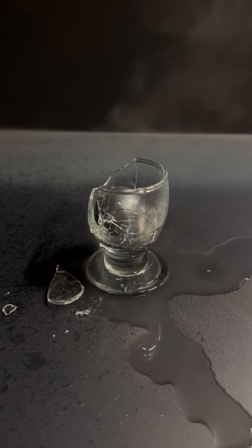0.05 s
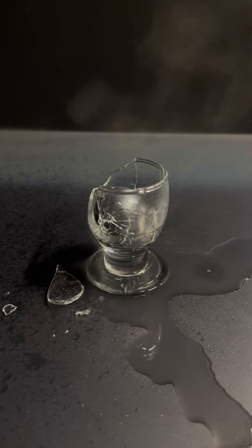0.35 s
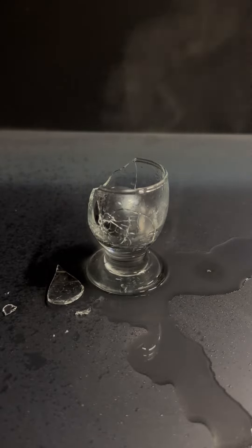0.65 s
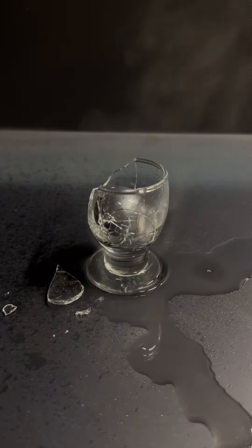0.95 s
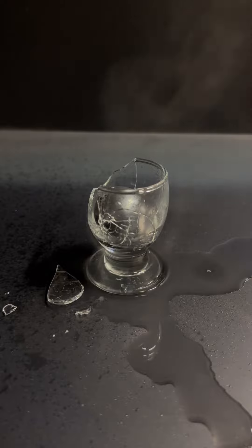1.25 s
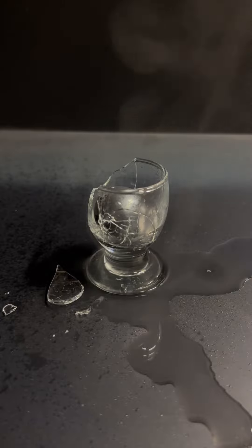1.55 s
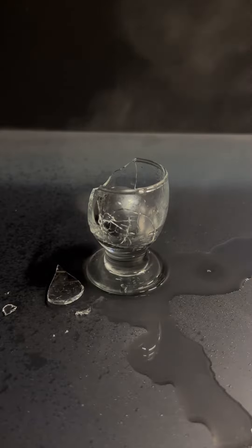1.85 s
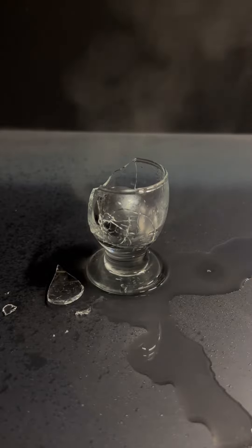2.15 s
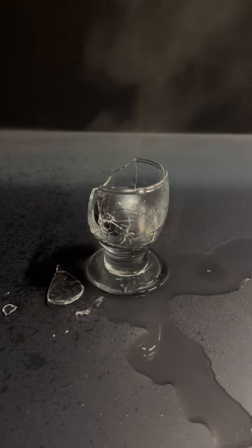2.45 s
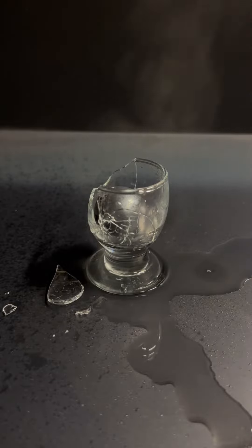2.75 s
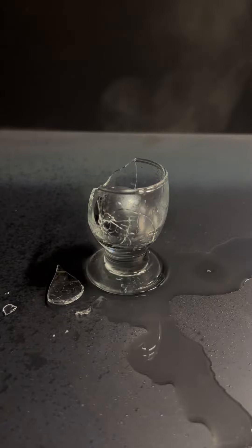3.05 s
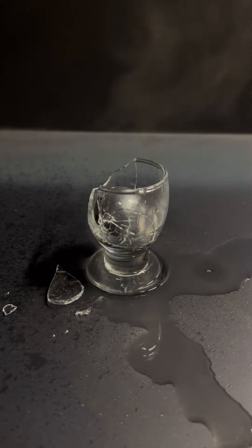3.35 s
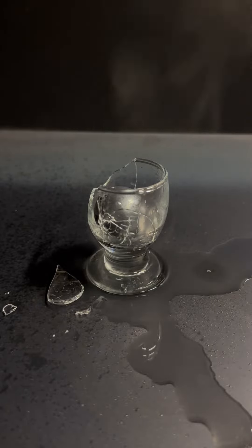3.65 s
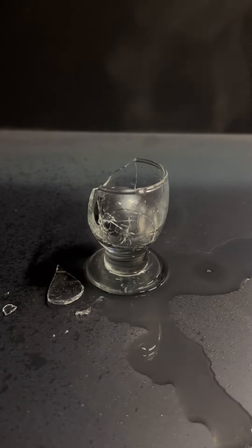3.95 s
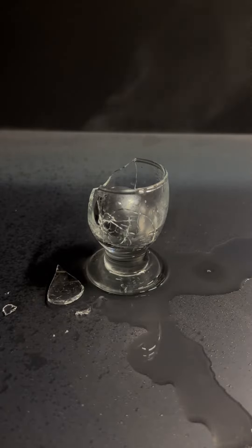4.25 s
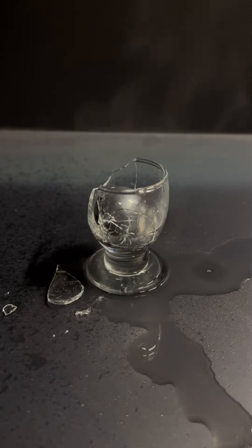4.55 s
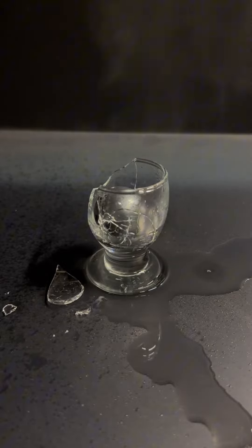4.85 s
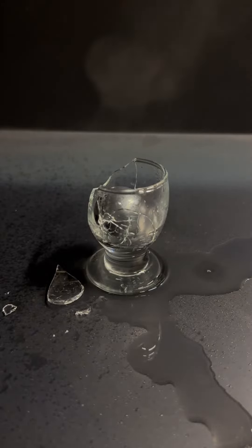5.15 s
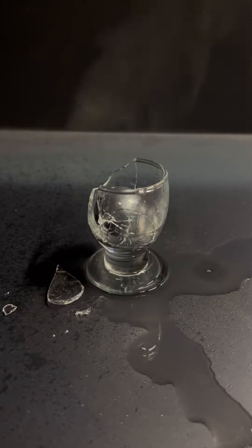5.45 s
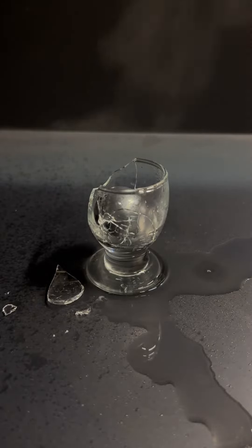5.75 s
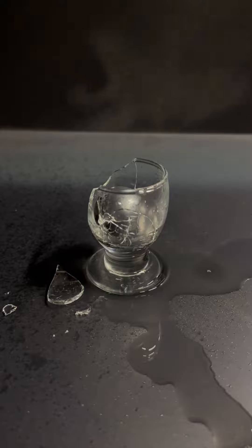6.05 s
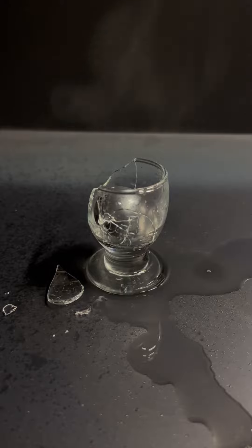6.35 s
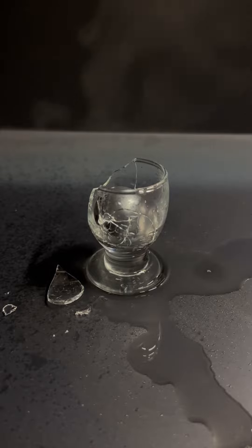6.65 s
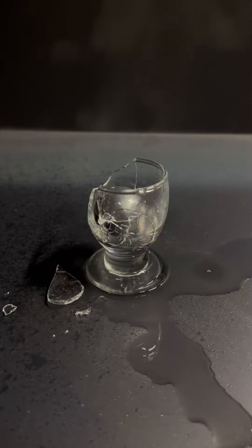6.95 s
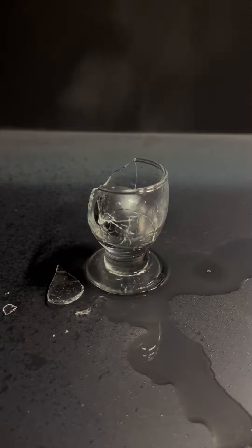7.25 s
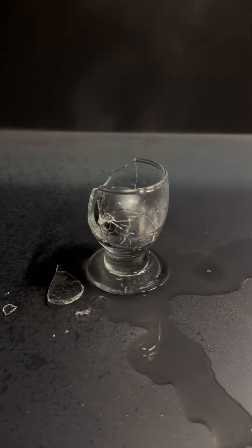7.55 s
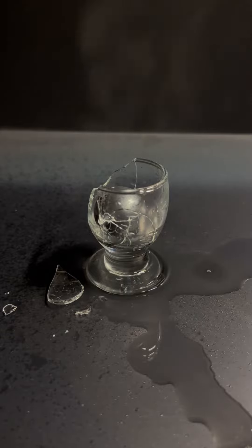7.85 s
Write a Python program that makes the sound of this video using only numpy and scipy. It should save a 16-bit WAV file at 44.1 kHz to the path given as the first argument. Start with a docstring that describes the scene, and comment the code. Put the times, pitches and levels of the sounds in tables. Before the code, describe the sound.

From the very start, water boils on a hot metal ball in a glass goblet, close to the microphone. It makes a loud, bright, fluttering hiss with a fine fizz on top, lasting the whole eight seconds. Drops spit off the metal in short, sharp spurts at uneven intervals, and tiny steam bursts give faint, brief rings in the glass. Underneath are a soft gurgle and low gulps of collapsing steam pockets, thickest in the first half second. A bubble plops right at the start, with smaller pops at about 1.2, 1.6, 2.7 and 4 seconds. Between about 3 and 4 seconds the hiss turns slightly duller, and it eases a little after 7 seconds. At about 7.8 seconds comes one soft, dull bump, as on the table. A faint low room rumble lies behind it all.

```python
"""Water boiling on hot metal

Water boils on a hot metal ball in a cracked glass goblet on a table, close to a two-port microphone.
Tiny steam bursts merge into a loud, fluttering hiss that the cup colours; some set the cup ringing.
Drops spit off the metal, steam pockets gulp and bubbles pop. Faint room rumble; one soft bump late on."""
import sys
import numpy as np
from scipy.fft import rfft, irfft, next_fast_len
from scipy.io import wavfile
from scipy.ndimage import map_coordinates

SR = 44100
rng = np.random.default_rng(int(sys.argv[2]) if len(sys.argv) > 2 else 0)


def unload_audio(sound):
    """Save the sound as a 16-bit wav file, at the path given as the first command line argument."""
    columns = np.transpose(np.atleast_2d(sound))
    # keep every value between -1 and 1, then stretch to whole-number steps
    steps = np.round(np.clip(columns, -1, 1) * 32767)
    wavfile.write(sys.argv[1], SR, steps.astype(np.int16))


N = 352800

# room rumble spectrum: f/Hz, relative level/dB
RUMBLE = [(22, -35), (33, -21), (45, -1), (68, -8), (96, -0.5), (130, -5.5), (180, -5.5), (260, -11.5),
          (400, -24), (900, -48), (2000, -120)]
# phase between the ports: f/Hz, lead of right/rad
PORT_PHASE = [(5600, 0), (6200, .4), (6600, 1), (8000, 1.61), (9000, 2), (10000, 2.5), (10700, 3),
              (13400, 3.5), (14200, 4), (15700, 5)]
# likeness of the ports: f/Hz, coherence
PORT_COHERENCE = [(100, 1), (380, .86), (700, 0.93), (1400, 1), (5400, 1), (6300, 1), (7500, 0.87),
                  (10000, 0.71), (10800, 1), (13300, 1), (14200, 0.74), (15500, .62)]
# resonances of cup and surroundings: f/Hz, half width/Hz, relative level/dB
CUP_MODES = [(607, 247, -15.4), (846, 169, -16.8), (1230, 154, -14.6), (1445, 132, -13.7),
             (1797, 72, -13.9), (1984, 148, -15.1), (2342, 62, -9.3), (2488, 105, -4.0), (2826, 73, -14.0),
             (3154, 169, -8.2), (3403, 131, -7.9), (3753, 222, -6.6), (4053, 195, -10.3),
             (4469, 132, -11.0), (4722, 138, -12.3), (5673, 649, -11.8), (6075, 193, -6.7),
             (6348, 278, -4.8), (6780, 162, 0.5), (7304, 195, -1.6), (7634, 59, -6.3), (7877, 188, -1.5),
             (8274, 144, -5.1), (8509, 121, -6.1), (8886, 191, -3.5), (9450, 199, -8.0)]
# dips between resonances: f/Hz, half width/Hz, level/dB
CUP_DIPS = [(355, 60, -3), (975, 60, -2.1), (1657, 40, -3.7), (2168, 38, -4.8), (2700, 45, -1),
            (5630, 70, -1.3)]
# spectrum of the finest spray: f/Hz, relative level/dB
SPRAY = [(5000, -60), (8800, -18), (9900, -9.8), (11700, -9.8), (13300, -12.5), (15800, -11.8),
         (16300, -60)]
# knocks of one bump: t/s, level/dB, final f/Hz
KNOCKS = [(7.7555, -13, 135), (7.767, -12, 94), (7.789, -21, 122)]
# large steam pockets collapsing: t/s, relative level/dB
GULPS = [(0.001, -21.5), (0.041, -20.5), (0.059, -20.5), (0.080, -26), (0.173, -26), (0.436, -22),
         (0.987, -28.5), (1.175, -27), (2.545, -28), (2.738, -24.5), (2.909, -26), (3.266, -28),
         (3.302, -28), (3.596, -29), (3.874, -24), (3.894, -30), (4.733, -27), (5.414, -30), (7.276, -27)]
# surface bubbles bursting: t/s, plop level/dB, nominal f/Hz, swell/s, puff level/dB
POPS = [(0.0393, -12.3, 750, .0014, -24), (1.1522, -26.5, 800, .0011, -31),
        (1.6225, -25.5, 1300, .001, -28), (2.7321, -16.5, 1300, .0007, -22), (2.7392, -24, 900, .0012, -27),
        (3.8525, -22, 750, .0012, -28), (3.9862, -17.5, 820, .0013, -25)]
# strong bursts ringing the cup: t/s, level/dB
RINGS = [(0.305, -22.5), (0.763, -24), (0.802, -22), (0.823, -22), (1.583, -23), (1.950, -22.5),
         (2.503, -22.5), (2.637, -23), (2.729, -22.5), (2.848, -22.5), (2.995, -23), (3.216, -22.5),
         (4.204, -22.5), (4.445, -24), (4.973, -22.5), (5.538, -22), (5.792, -22), (6.156, -23),
         (6.289, -23), (6.406, -20.5), (6.910, -20.5), (7.008, -22.5), (7.444, -23)]
# spits off the metal: t/s, level/dB, swell/s
SPITS = [(0.053, -13, .003), (0.422, -17, .005), (0.545, -12, .002), (0.692, -18, .011),
         (0.736, -17.5, .004), (0.764, -17.5, .006), (0.884, -13.5, .004), (1.646, -13, .003),
         (1.738, -15, .005), (2.133, -14.5, .003), (2.224, -13, .002), (2.358, -15.5, .004),
         (2.777, -16, .004), (3.570, -12.5, .003), (4.233, -15.5, .004), (4.434, -14.5, .002),
         (4.599, -13, .003), (4.875, -13.5, .0015), (5.031, -11.5, .001), (5.328, -15.5, .004),
         (5.361, -14, .005), (5.558, -17.5, .009), (5.644, -11.5, .004), (6.660, -13.2, .0035),
         (6.822, -12, .002)]
# boiling envelopes, low band to high: t/s, relative level/dB
GURGLE_LEVEL = [(0.1, -36.3), (1.3, -36.7), (1.9, -37.4), (2.6, -36.6), (3.6, -36.9), (7.0, -36.4),
                (7.4, -35.4), (8.0, -35.5)]
SEETHE_LEVEL = [(0.01, -22.7), (0.09, -23.6), (0.24, -22.5), (0.65, -23.2), (0.89, -22.0), (1.0, -23.3),
                (1.2, -22.6), (1.32, -24.0), (1.56, -22.7), (2.73, -22.7), (2.92, -23.1), (3.08, -24.3),
                (3.25, -22.6), (3.44, -24.6), (3.6, -23.0), (4.08, -24.2), (4.6, -22.5), (5.29, -23.1),
                (5.88, -22.5), (6.08, -23.5), (6.17, -22.6), (7.45, -22.8), (7.72, -24.3), (8.0, -22.2)]
HISS_LEVEL = [(0.01, -17.1), (0.53, -17.2), (0.6, -17.9), (0.72, -16.7), (1.04, -18.0), (1.44, -17.5),
              (1.52, -18.9), (1.6, -16.7), (1.84, -17.8), (2.36, -16.5), (2.48, -17.5), (2.88, -16.9),
              (2.96, -18.5), (3.12, -16.9), (4.17, -18.1), (4.25, -17.1), (4.33, -18.0), (4.6, -16.8),
              (4.72, -17.7), (4.84, -16.9), (5.12, -17.8), (5.64, -16.6), (6.04, -18.4), (6.17, -17.4),
              (6.52, -16.9), (6.72, -17.6), (7.29, -17.5), (7.41, -18.5), (7.64, -18.3), (7.76, -19.5),
              (7.88, -18.6), (8.0, -19.2)]
FIZZ_LEVEL = [(0.01, -22.4), (0.24, -21.0), (0.6, -22.5), (1.0, -21.5), (1.48, -23.4), (1.64, -21.7),
              (2.69, -21.2), (3.28, -23.1), (3.52, -21.9), (4.29, -22.8), (4.49, -20.8), (4.6, -22.6),
              (5.56, -22.5), (7.6, -22.9), (7.84, -24.3), (8.0, -22.4)]
# stereo width, 0-1: t/s, hiss width, sharp hiss width
HISS_WIDTH = [(4.2, 1, 1), (4.35, 0, .85), (4.9, 0, .85), (5.05, 0, .48), (5.35, 0, .45), (5.6, 0, .9),
              (7.25, 0, .86), (7.35, 1, 1)]

MURMUR_DB, MURMUR_SPREAD_DB, MURMUR_FADE_DB_PER_S = -36.2, 11, .42
POP_START_RATIO, POP_END_HZ, POP_GLIDE_RATIO = 1.5, 165, 1.7
RING_HZ, RING_SCATTER, RING_SWELL_S = 2495, .02, .005
SMALL_RING_DB, SMALL_RING_SPREAD_DB = -28.3, 4
SMALL_SPIT_DB, SMALL_SPIT_SPREAD_DB, SMALL_SPIT_SWELL_S = -20.2, 6, .002
COOLING_S, TILT_DB = (2.7, 4.2), (1.9, .5)  # sharp hiss over hiss: dulls as the metal cools
TOP_HZ = 15750


def amp(db):
    return 10 ** (np.asarray(db) / 20)


def unit_rms(x):
    return x / np.sqrt(np.mean(x ** 2) + 1e-20)


def log_interp(points, hz):
    """Interpolate (f/Hz, value) rows on a log axis."""
    f, values = np.transpose(points)
    return np.interp(np.log(hz + 1), np.log(f + 1), values)


def curves(rows):
    """Per-sample curve for each column after t/s."""
    times_s, *columns = np.transpose(rows)
    return [np.interp(np.arange(N) / SR, times_s, column) for column in columns]


def wobble(rate_hz):
    """Smooth random curve with knots at rate_hz."""
    knots = rng.standard_normal(int(N * rate_hz / SR) + 4)
    return map_coordinates(knots, [np.arange(N) * rate_hz / SR])


def add(track, at_s, sound):
    start = max(round(at_s * SR), 0)
    part = track[start:start + len(sound)]
    part += sound[:len(part)]


def band(hz, low_hz, high_hz, order=16):
    """Smooth band-pass gain."""
    below_low, below_high = (1 / (1 + (hz / edge_hz) ** order) for edge_hz in (low_hz, high_hz))
    return np.sqrt((1 - below_low) * below_high)


def swelling(t, swell_s):
    """Envelope: 1 at swell_s, then decay."""
    return t / swell_s * np.exp(1 - t / swell_s)


def blip(start_hz, end_hz, glide_s, swell_s, sharpness):
    """Damped sine with a pitch glide."""
    t = np.arange(SR // 6) / SR
    pitch_hz = end_hz + (start_hz - end_hz) * np.exp(-t / glide_s)
    return swelling(t, swell_s) ** sharpness * np.sin(2 * np.pi * np.cumsum(pitch_hz) / SR)


def ports(noises, colour):
    """Two noises to coloured stereo, rms 1; treble reaches the ports out of step."""
    size = next_fast_len(N + SR // 4)
    hz = np.fft.rfftfreq(size, 1 / SR)
    angle = np.arccos(np.clip(log_interp(PORT_COHERENCE, hz), -1, 1)) / 2
    mid, side = rfft(noises, size) * colour(hz) * [np.cos(angle), np.sin(angle)]
    lead = np.exp(.5j * log_interp(PORT_PHASE, hz))
    return unit_rms(irfft([(mid + side) / lead, (mid - side) * lead], size)[:, :N])


def narrowed(pair, width):
    """Narrow the stereo image at constant power."""
    mid, side = (pair[0] + pair[1]) / 2, (pair[0] - pair[1]) / 2
    mid = mid * np.sqrt(1 + (1 - width ** 2) * side.var() / mid.var())
    return np.array([mid + width * side, mid - width * side])


def cup(hz):
    """Cup gain: resonances and open spray add in power, with dips between."""
    grid_hz = np.linspace(0, SR / 2, SR // 10)
    mode_power = sum(amp(db) ** 2 / (1 + ((grid_hz - f) / width) ** 2) ** 2 for f, width, db in CUP_MODES)
    spray_power = amp(log_interp(SPRAY, grid_hz)) ** 2
    dip_db = sum(db * np.exp(-((grid_hz - f) / width) ** 2) for f, width, db in CUP_DIPS)
    return np.interp(hz, grid_hz, amp(dip_db) * np.sqrt(mode_power + spray_power))


def early_echoes(direct, count=8, level_db=-29):
    """Weak reflections off the table and nearby things: a light comb."""
    heard = direct.copy()
    for distance, polarity in rng.random((count, 2)):
        lag = int((.002 + .007 * distance) * SR)
        heard[:, lag:] += np.sign(polarity - .5) * amp(level_db) * direct[:, :N - lag]
    return heard


def room(level_db=-40):
    """Steady low rumble."""
    return amp(level_db) * ports(rng.standard_normal((2, N)), lambda hz: amp(log_interp(RUMBLE, hz)))


def bump():
    """Dull push, as on the table; dies at once."""
    track = np.zeros(N)
    for at_s, db, hz in KNOCKS:
        add(track, at_s, amp(db) * blip(1.9 * hz, hz, glide_s=.0059, swell_s=.0125, sharpness=3.8))
    return track


def steam_pockets(murmurs=230):
    """Pockets collapse under water: large ones gulp; small ones murmur, weaker as the metal cools."""
    track = np.zeros(N)
    for at_s, db in GULPS:
        tune = np.exp(.1 * rng.standard_normal())
        gulp = blip(310 * tune, 105 * tune, glide_s=.006, swell_s=.007, sharpness=2)
        add(track, at_s, amp(db - 1.5) * gulp)
    for when, strength, pitch in rng.random((murmurs, 3)):
        at_s, tune = when * N / SR, np.exp(.6 * (pitch - .5))
        db = MURMUR_DB + MURMUR_SPREAD_DB * (strength - .5) - MURMUR_FADE_DB_PER_S * at_s
        murmur = blip(320 * tune, 105 * tune, glide_s=.008, swell_s=.0079, sharpness=1.8)
        add(track, at_s, amp(db) * murmur)
    return track


def pops(puff_decay_s=.002):
    """A bursting bubble: dry puff plus a plop of plunging pitch."""
    plops, puff_envelope = np.zeros((2, N))
    t = np.arange(SR // 30) / SR
    for at_s, plop_db, hz, swell_s, puff_db in POPS:
        plop = blip(POP_START_RATIO * hz, POP_END_HZ, POP_GLIDE_RATIO * swell_s, swell_s, sharpness=1.1)
        add(plops, at_s, amp(plop_db) * plop)
        add(puff_envelope, at_s, amp(puff_db) * np.exp(-t / puff_decay_s))
    return plops + puff_envelope * ports(rng.standard_normal((2, N)), lambda hz: band(hz, 400, 2200))


def cup_rings(small_count=90):
    """Steam bursts ring the cup's main resonance, each slightly detuned."""
    track = np.zeros(N)
    small = [(when * N / SR, SMALL_RING_DB + SMALL_RING_SPREAD_DB * (size - .5))
             for when, size in rng.random((small_count, 2))]
    for at_s, db in [*RINGS, *small]:
        start_hz, end_hz = RING_HZ * np.exp(RING_SCATTER * rng.standard_normal(2))
        ring = blip(start_hz, end_hz, glide_s=RING_SWELL_S, swell_s=RING_SWELL_S, sharpness=1.5)
        add(track, at_s, amp(db) * ring)
    return track


def spits(small_count=24):
    """Drops touch bare metal and flash into short, bright spurts."""
    t, envelope = np.arange(SR // 10) / SR, np.zeros(N)
    small = [(when * N / SR, SMALL_SPIT_DB + SMALL_SPIT_SPREAD_DB * (size - .5), SMALL_SPIT_SWELL_S)
             for when, size in rng.random((small_count, 2))]
    for at_s, db, swell_s in [*SPITS, *small]:
        add(envelope, at_s, amp(db) * swelling(t, swell_s))
    return envelope * ports(rng.standard_normal((2, N)), lambda hz: cup(hz) * band(hz, 5000, 9500))


def steam(low_hz, high_hz, bursts_per_s=5000, spread_db=2, burst_share=.25):
    """Tiny uneven bursts on a bed of merged ones; one band, heard through the cup."""
    kicks = (rng.random((2, N)) < bursts_per_s / SR) * rng.standard_normal((2, N))
    sizes = amp(spread_db * np.clip(rng.standard_normal(N), -2, 2))
    bursts = np.sqrt(burst_share) * unit_rms(kicks * sizes)
    bed = np.sqrt(1 - burst_share) * rng.standard_normal((2, N))
    return ports(bursts + bed, lambda hz: cup(hz) * band(hz, low_hz, high_hz))


def sizzle():
    """The vapour film flutters on the metal, driving seethe, hiss and fizz together over a low gurgle."""
    gurgle_db, = curves(GURGLE_LEVEL)
    seethe_db, = curves(SEETHE_LEVEL)
    boil_db, = curves(HISS_LEVEL)
    fizz_db, = curves(FIZZ_LEVEL)
    hiss_width, sharp_width = curves(HISS_WIDTH)
    boil_db += .2 * wobble(14) - 3.6  # shared by two bands
    tilt_db = np.interp(np.arange(N) / SR, COOLING_S, TILT_DB)
    flutter = unit_rms(wobble(70) + .49 * wobble(170))
    gurgle = steam(150, 1050) * amp(gurgle_db + .7 * wobble(60))
    seethe = steam(1050, 5220) * amp(seethe_db + .15 * flutter + .75 * wobble(70))
    hiss = narrowed(steam(5300, 7070), hiss_width)
    hiss *= amp(boil_db - tilt_db / 2 + .55 * flutter + .65 * wobble(60))
    sharp_hiss = narrowed(steam(7320, 9800), sharp_width)
    sharp_hiss *= amp(boil_db + tilt_db / 2 + .75 * flutter + .55 * wobble(60))
    fizz = steam(9570, 20000) * amp(fizz_db + .25 * flutter + 1.05 * wobble(60) + .55 * wobble(14))
    return gurgle + seethe + hiss + sharp_hiss + fizz


def scene():
    """Boiling goblet on a table in a quiet room."""
    return early_echoes(sizzle() + spits()) + cup_rings() + steam_pockets() + pops() + bump() + room()


def record(dry):
    """Brick-wall low-pass at TOP_HZ."""
    size = next_fast_len(N + SR // 4)
    passband = np.fft.rfftfreq(size, 1 / SR) < TOP_HZ
    return irfft(rfft(dry, size) * passband, size)[..., :N]


dry = scene()
out = record(dry)
unload_audio(out)
```